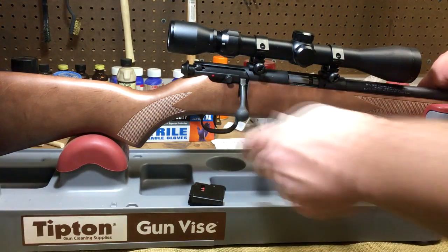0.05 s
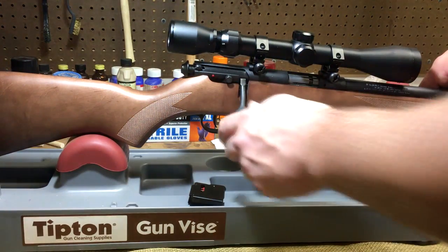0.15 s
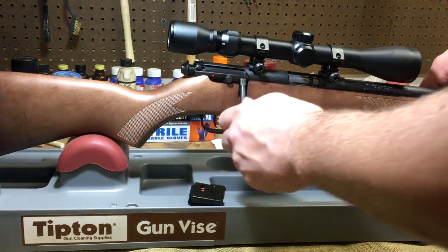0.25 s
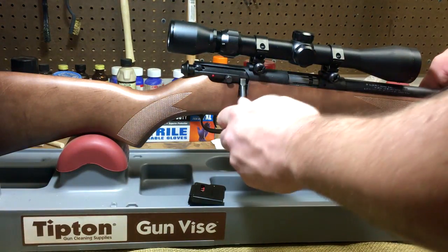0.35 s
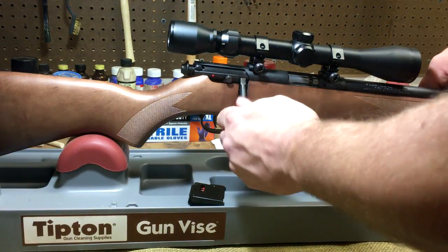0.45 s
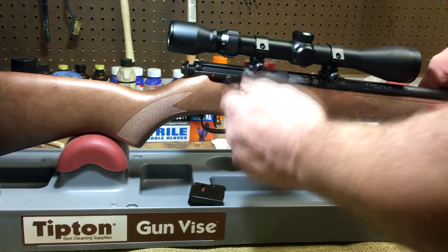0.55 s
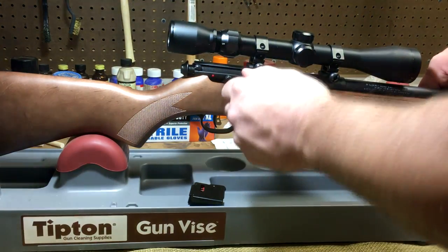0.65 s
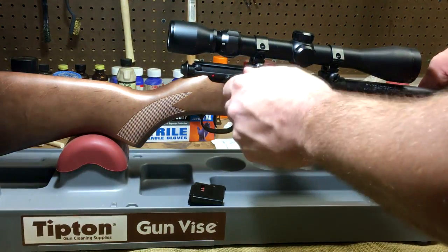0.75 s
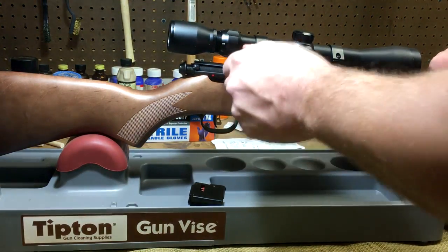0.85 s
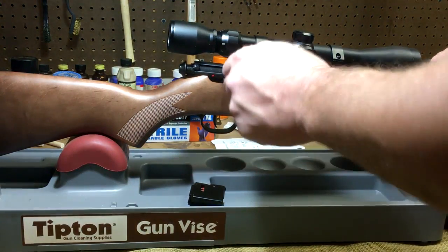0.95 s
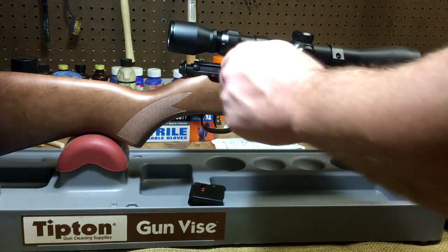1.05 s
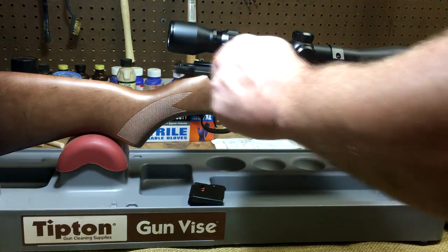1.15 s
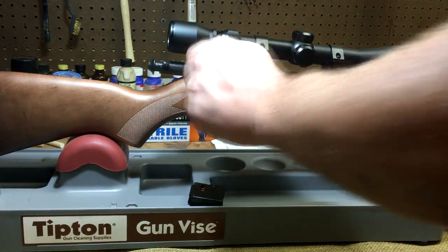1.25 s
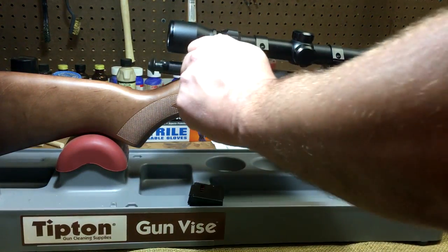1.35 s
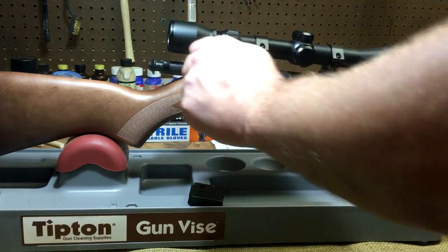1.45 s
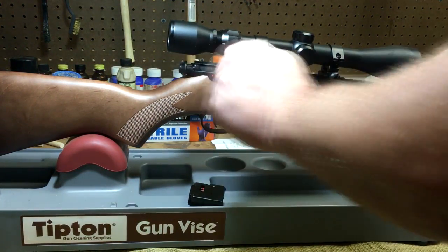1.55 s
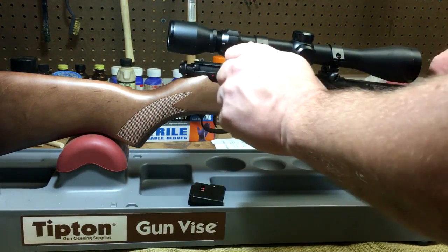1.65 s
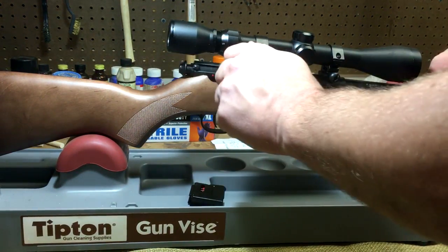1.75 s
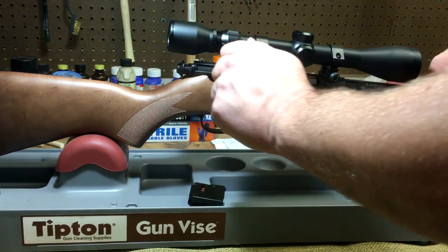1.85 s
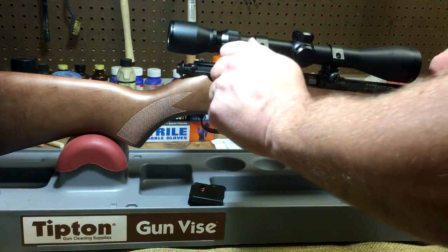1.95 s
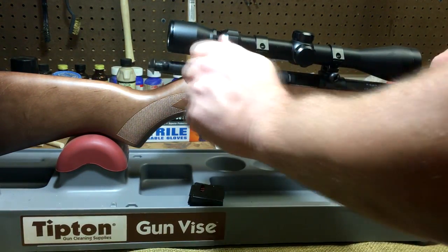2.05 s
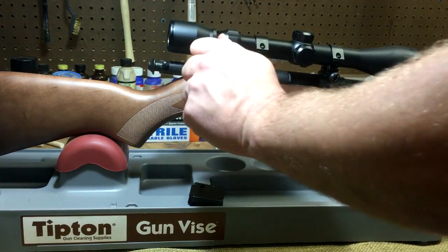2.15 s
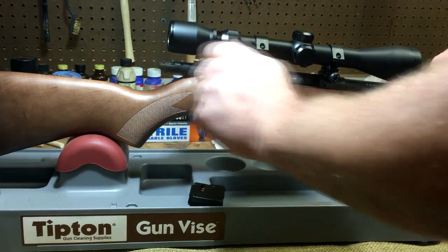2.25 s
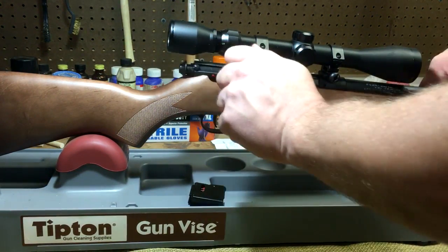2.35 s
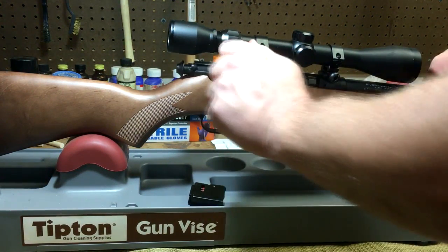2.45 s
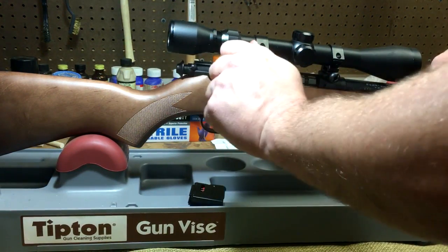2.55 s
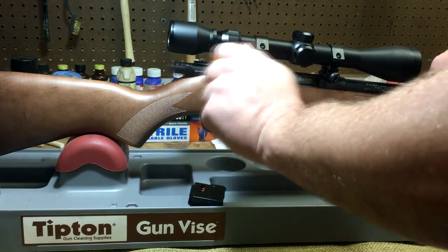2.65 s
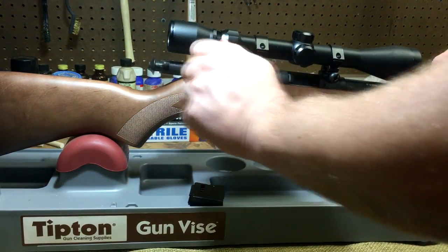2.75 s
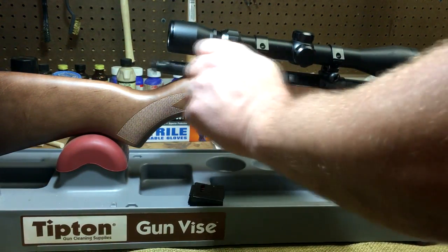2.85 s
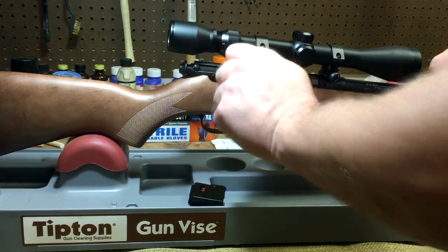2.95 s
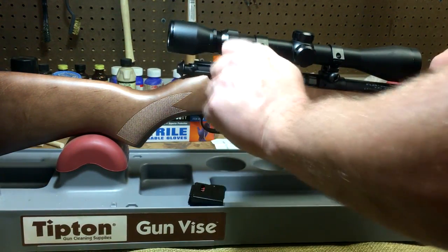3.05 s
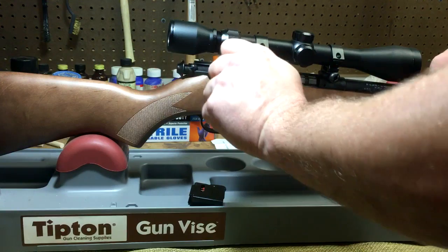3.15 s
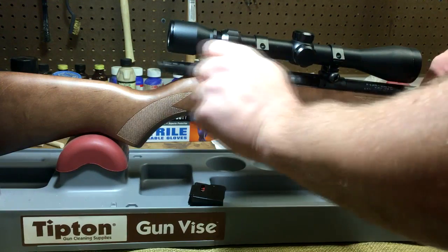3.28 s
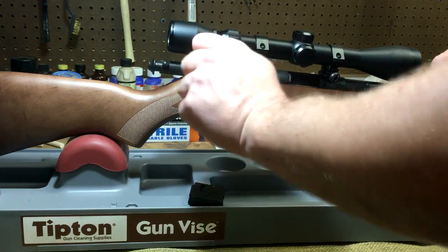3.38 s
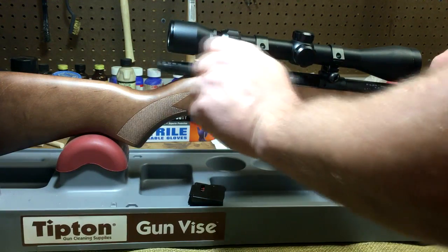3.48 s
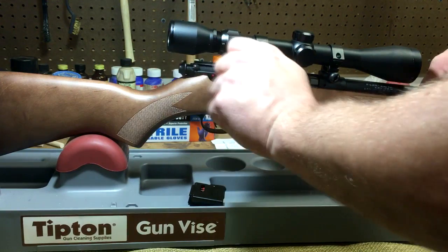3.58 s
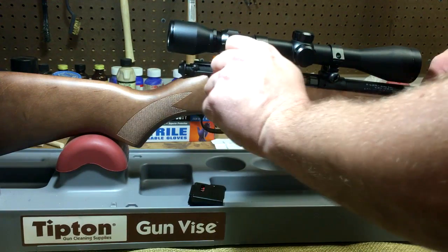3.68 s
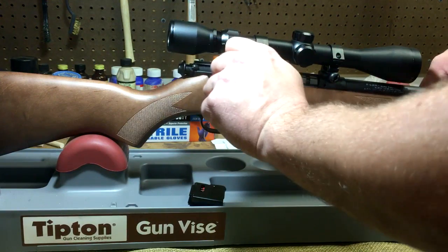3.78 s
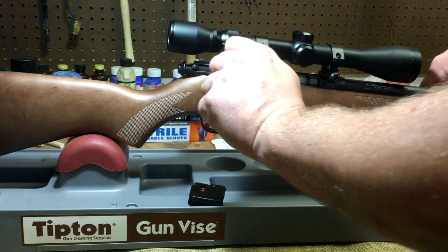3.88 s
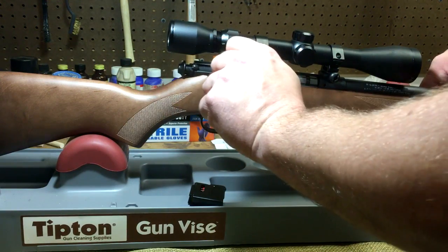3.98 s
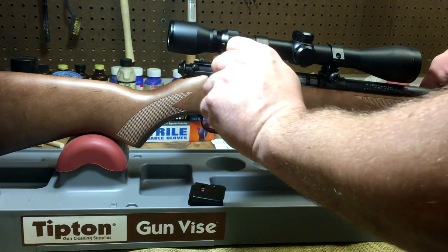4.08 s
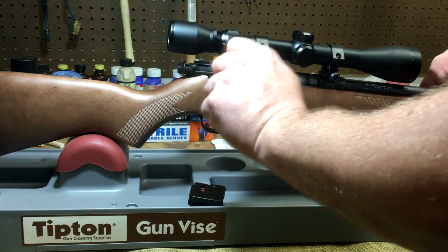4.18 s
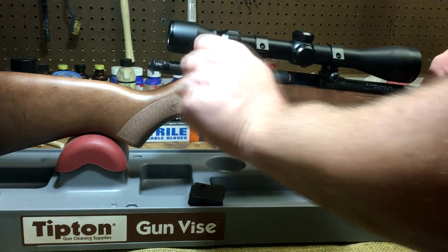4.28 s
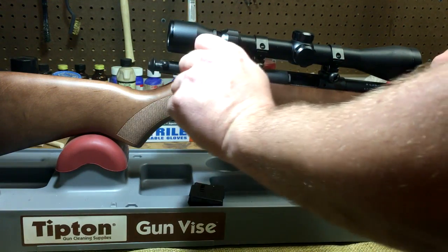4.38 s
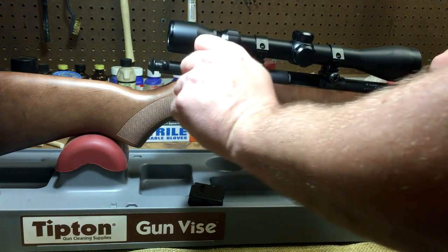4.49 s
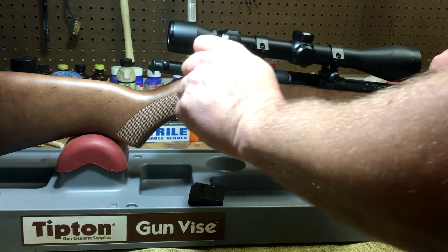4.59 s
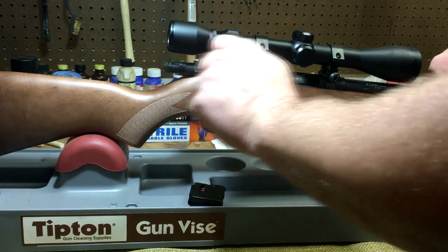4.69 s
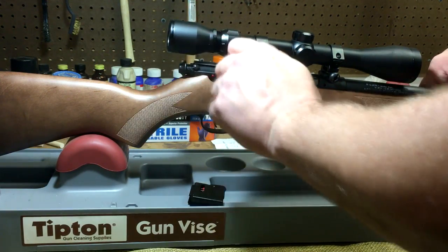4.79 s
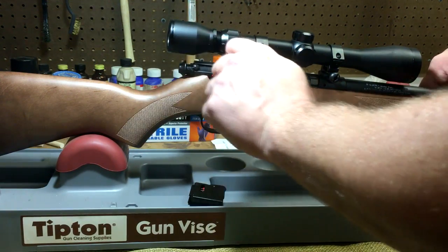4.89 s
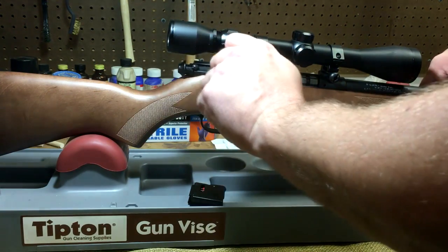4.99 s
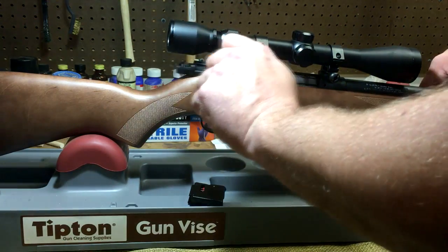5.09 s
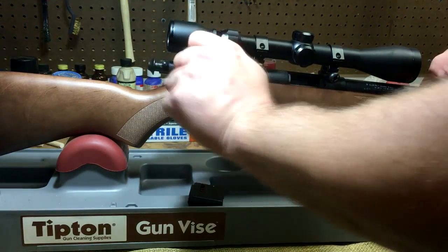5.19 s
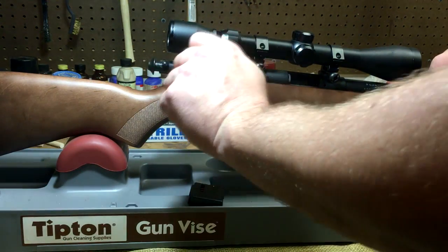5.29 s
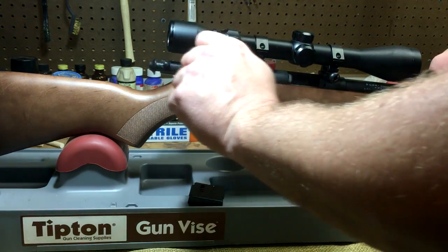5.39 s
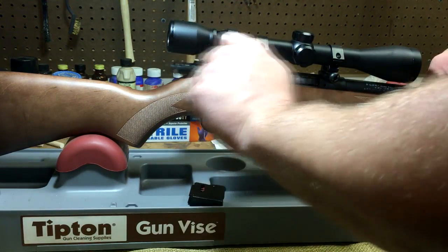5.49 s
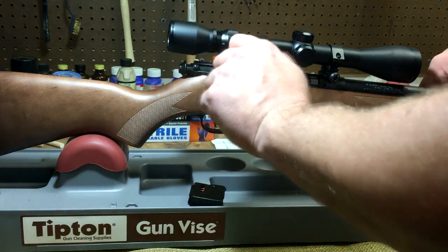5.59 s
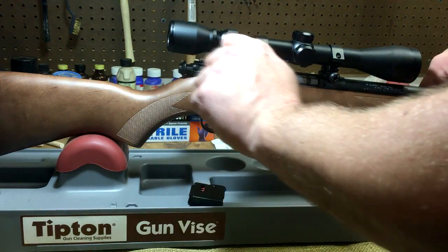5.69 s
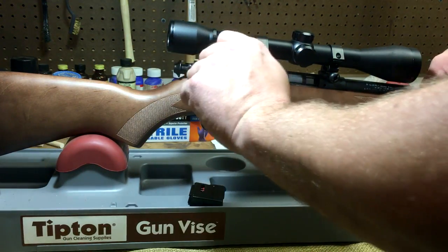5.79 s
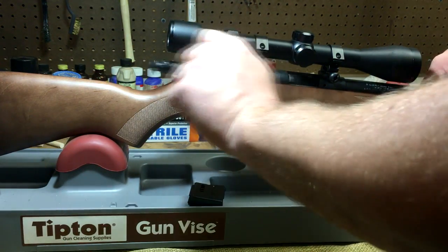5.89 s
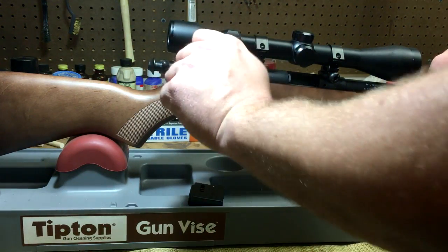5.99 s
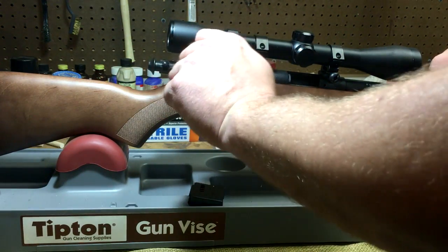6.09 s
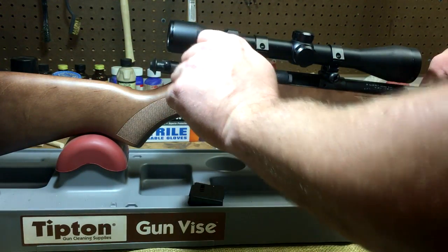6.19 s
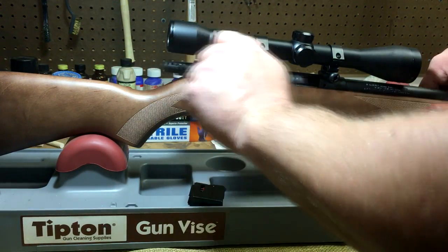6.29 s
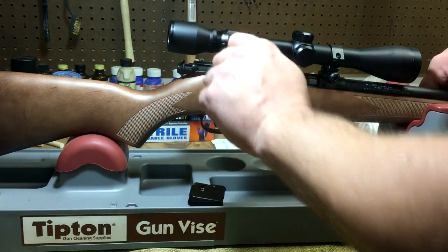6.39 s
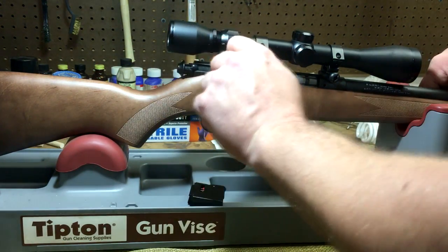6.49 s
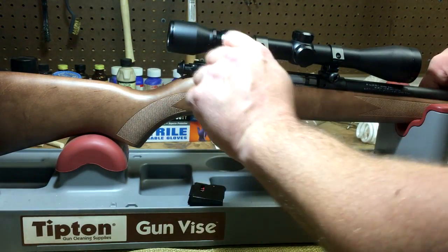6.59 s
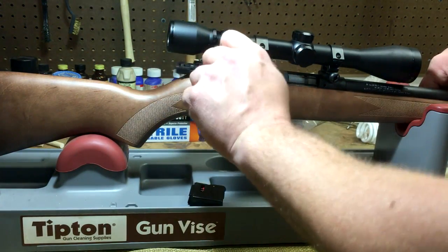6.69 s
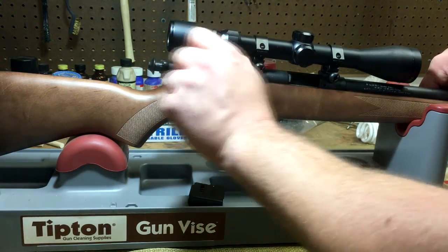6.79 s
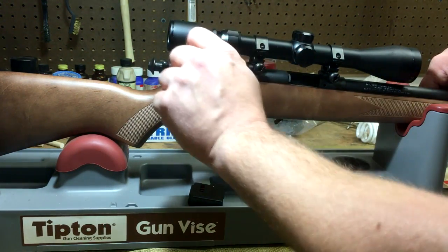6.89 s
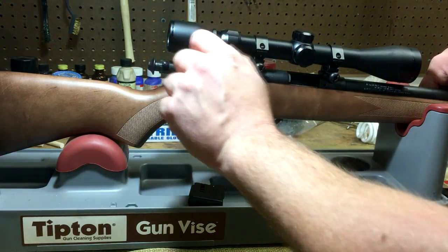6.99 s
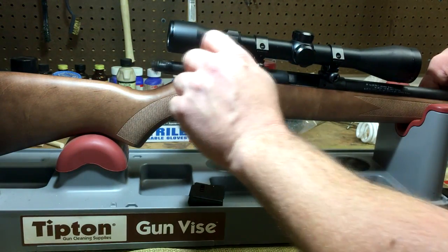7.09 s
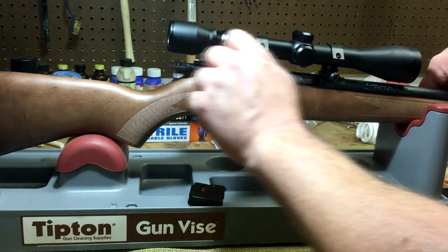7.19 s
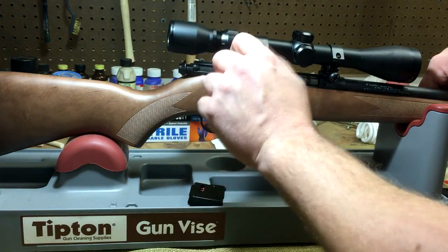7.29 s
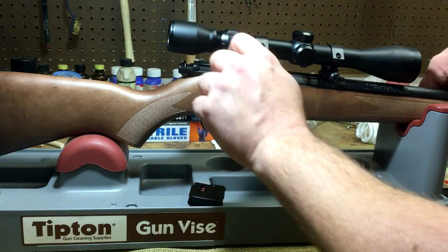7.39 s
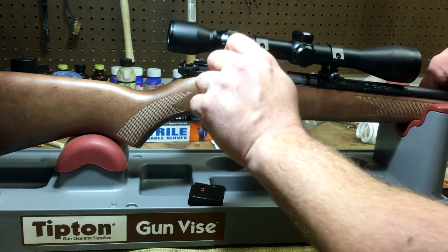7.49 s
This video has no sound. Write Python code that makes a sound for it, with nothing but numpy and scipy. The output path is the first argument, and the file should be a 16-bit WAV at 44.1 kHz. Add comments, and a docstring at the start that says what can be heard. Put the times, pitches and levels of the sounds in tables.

```python
"""A hand brushes along its rest, and the bolt handle of a rifle held in a plastic vise knocks as it is turned.
Then, eight times, the bolt jerks free, scrapes back (once with a faint high tick), clacks against its
rear stop and is pushed home. Each blow is a burst of noise bands plus ringing steel; low modes of stock
and vise thump a moment later. Wood creaks now and then, and a small, live workshop rings after every blow.
Faint noise of still air and a steady electric hum, made of sines, run throughout."""
import sys
import numpy as np
from scipy import signal
from scipy.fft import rfft, irfft
from scipy.io import wavfile

SR = 44100
rng = np.random.default_rng(int(sys.argv[2]) if len(sys.argv) > 2 else 0)


def output_pcm(signal):
    """Save a mono or channel-first signal as 16-bit PCM at the path in sys.argv[1].

    Samples are clipped to [-1, 1] before scaling.
    """
    pcm = np.clip(np.atleast_2d(signal).T, -1, 1) * 32767
    wavfile.write(sys.argv[1], SR, np.round(pcm).astype(np.int16))


N = 332514
TIME = np.arange(N) / SR
SHORT, LONG = TIME[:4096], TIME[:12288]  # time axes of single sounds [s]
BAND_HZ = 50 * 2 ** (np.arange(35) / 4)  # centres of the quarter-octave bands

# All levels of blows and scrapes are relative: rifle() sets their final loudness.
# knocks of the handle, and one faint high tick as the bolt slides back:
# (time [s], level [dB], favoured pitch [Hz], its boost [dB])
KNOCKS_AND_TICK = [(.566, -41, 2300, 1), (0.6345, -16, 588, 12), (0.8545, -19.5, 1300, 3),
                   (0.8739, 0, 2045, 9), (2.741, -34, 4115, 22)]
# the bolt jerks free, slides back and hits its rear stop:
# (jerk time [s], jerk level [dB], jerk pitch [Hz], scrape level [dB], stop time [s], stop level [dB],
#  hardness as treble tilt [dB per octave], stop pitch [Hz], its boost [dB])
PULLS = [(1.201, -27, 1320, -44, 1.3027, 1, .75, 1340, 2),
         (2.048, -26, 1700, -45, 2.1150, -1.5, -.5, 790, 5.5),
         (2.707, -33, 700, -50, 2.8108, -5, -1.5, 741, 24),
         (3.309, -35, 480, -45, 3.3834, -4.5, -1, 736, 21),
         (4.2653, -16, 1200, -49.5, 4.344, 0, -1, 562, 3),
         (5.157, -27.5, 740, -48.5, 5.2185, 1.2, 1, 3290, 2.5),
         (5.901, -27.5, 2300, -44.5, 5.9603, .5, 0, 1630, 4.5),
         (6.767, -24, 778, -49.5, 6.8451, -9, -.7, 3450, 11)]
# the bolt slides forward, touches the breech and then seats:
# (time of top speed [s], scrape level [dB], singing of the steel [dB], speed left on arrival [0-1],
#  touch time [s], touch level [dB], seating level [dB], seating pitch [Hz], its boost [dB])
PUSHES = [(1.585, -43.5, -8, .95, 1.6091, -4.5, 0, 1101, 4.5),
          (2.335, -42, -4.5, 1, 2.3454, -7.5, .5, 2177, -1),
          (2.955, -43.5, -2, .95, 2.9788, -10, -1.5, 3940, 4),
          (3.575, -43, -5.5, .95, 3.6128, -11, -17, 1900, 5),
          (4.715, -49, -7.5, 1, 4.8105, -16.5, -14.5, 500, 11.5),
          (5.525, -41, -1, .85, 5.5684, -14, -4.5, 4100, 9.5),
          (6.345, -41.5, -8.5, .2, 6.4170, -21, -30, 500, 10),
          (7.21, -50, -24, .65, 7.2766, -16, -14, 500, 13)]
# tone colour of knocks, tick and jerks: (frequency [Hz], relative level [dB])
KNOCK_COLOUR = [(150, -13), (350, 4), (700, -1.5), (1200, 1.5), (2300, 0), (3000, -9), (4200, -2),
                (6000, -18), (9000, -18), (13000, -21), (16000, -30.5)]
# tone colour of sliding: (frequency [Hz], relative level [dB])
SLIDE_COLOUR = [(150, -10), (300, 3), (480, 5.5), (650, 0), (1400, -5.5), (1900, -4), (2350, -3),
                (2850, -10), (4000, -5), (5000, -15.5), (7000, -13.5), (10000, -18.5), (16000, -29)]
THUMP_GROWTH = .62  # dB of thump for each dB of the blow


def undb(db):
    """Turn decibels into gain."""
    return 10 ** (np.asarray(db) / 20)


def unit(x):
    """Scale to an energy of one."""
    return x / np.sqrt(np.sum(x ** 2, axis=-1, keepdims=True) + 1e-18)


def read(table, hz, axis=1):
    """Read one column of a table between its rows, along log frequency."""
    table = np.array(table)
    return np.interp(np.log(np.maximum(hz, 1)), np.log(table[:, 0]), table[:, axis])


def add(out, s, x):
    """Mix x into out from time s."""
    i = int(s * SR)
    out[i:i + len(x)] += x[:N - i]


def fade(t, t60):
    """Die away exponentially, by 60 dB in t60 seconds."""
    return np.exp(-np.log(1000) * t / t60)


def tilt(hz, tilt_db, edge_hz=7000):
    """Lean the spectrum towards the treble for harder contacts, most of all above the edge."""
    octaves = np.log2(np.maximum(hz, 300) / 2000)
    octaves_past_edge = np.log2(np.maximum(hz / edge_hz, 1))
    return tilt_db * (octaves + 4 * octaves_past_edge)


def shade(x, colour, tilt_db=0):
    """Shape the spectrum of a signal and give it an rms of one."""
    hz = np.fft.rfftfreq(len(x), 1 / SR)
    gain = undb(read(colour, hz) + tilt(hz, tilt_db))
    return unit(irfft(rfft(x) * gain, len(x))) * np.sqrt(len(x))


def noise_bands(size):
    """Split noise into quarter-octave bands that overlap like triangles."""
    hz = np.fft.rfftfreq(size, 1 / SR) + 1
    octaves_away = np.abs(np.log2(hz) - np.log2(BAND_HZ[:, None]))
    share = np.maximum(1 - octaves_away * 4, 0)
    return irfft(rfft(rng.standard_normal(size)) * share, size)


def rifle():
    """What the rifle radiates in one direction: blows, scraping and creaks."""
    strokes = knocking() + pulling() + pushing()
    return undb(9.5) * strokes + undb(-1.5) * scraping() + creaks()


def knocking():
    """The handle knocks as it is turned; one faint high tick follows later, as the bolt slides back."""
    knocks = [(s, db, hardness(db), hz, boost_db) for s, db, hz, boost_db in KNOCKS_AND_TICK]
    steel = blows(knocks, KNOCK_COLOUR, press_s=.0015, ease_s=.0003, ring_db=-9, axis=2)
    return steel + thumps(knocks, level_db=-11.5)


def pulling():
    """The bolt jerks free and is thrown against its rear stop."""
    # tone colour of the rear stop: (frequency [Hz], relative level [dB])
    rear_colour = [(150, -15), (300, -6), (600, -2), (800, -8.5), (1200, 0), (2300, -0.5), (2800, -4.5),
                   (3600, 0.5), (5000, -6.5), (6500, -4.5), (8000, -12.5), (11000, -10.5), (13000, -18.5),
                   (16000, -29)]
    jerk_boost_db = 11  # lift of the favoured pitch
    jerks = [(s, db, hardness(db), hz, jerk_boost_db) for s, db, hz, *_ in PULLS]
    free = blows(jerks, KNOCK_COLOUR, press_s=.0015, ease_s=.0003, ring_db=-9, axis=2)
    free = free + thumps(jerks, level_db=-11)
    stop = blows(rear_stops(), rear_colour, press_s=.0013, ease_s=.00014, ring_db=-8.5, axis=1)
    return free + stop + thumps(rear_stops(), level_db=-9.7)


def pushing():
    """The bolt touches the breech, then seats with the weight of the hand behind it."""
    # tone colour of touch and seating: (frequency [Hz], relative level [dB])
    front_colour = [(150, -7.5), (300, -4.5), (480, 4), (620, 1.5), (1100, 3), (1550, 0), (2300, 3.5),
                    (2850, -10), (4100, 2), (5000, -11), (6300, -7.5), (7500, -16.5), (10000, -13),
                    (16000, -33.5)]
    touch_hz, touch_boost_db = 2150, 6  # region favoured by the touch
    touches = [(s, db, hardness(db), touch_hz, touch_boost_db) for _, _, _, _, s, db, *_ in PUSHES]
    steel = blows(touches + seatings(), front_colour, press_s=.0016, ease_s=.00006, ring_db=-7, axis=2)
    return steel + thumps(seatings(), level_db=-11)


def rear_stops():
    """The blow that ends each pull."""
    return [row[4:] for row in PULLS]


def seatings():
    """The blow that ends each push, a few milliseconds after the touch; a gentler push takes longer."""
    delay_s, delay_s_per_db = .0056, .00017  # delay at 0 dB, and how much each dB shortens it
    return [(s + delay_s - delay_s_per_db * db, db, hardness(db), hz, boost_db)
            for *_, s, _, db, hz, boost_db in PUSHES]


def hardness(db):
    """Treble tilt of a contact: the stronger the blow, the brighter."""
    soft_tilt_db, hard_tilt_db = -1.8, .8  # per octave, for the faintest contact and for a blow of 0 dB
    return soft_tilt_db + (hard_tilt_db - soft_tilt_db) * undb(db)


def contact(hz, tilt_db, focus_hz, focus_db, octaves=0.13):
    """Weight in dB of each frequency: hardness tilts it, the point of contact favours one region."""
    return tilt(hz, tilt_db) + focus_db * np.exp(-(np.log2(hz / focus_hz) / octaves) ** 2)


def blows(rows, colour, press_s, ease_s, ring_db, axis, softening=.3):
    """Steel hits steel: each row (s, dB, tilt, favoured Hz, boost) gives a clack and the ring of the action."""
    # ringing of the action: (frequency [Hz], relative level at the rear stop [dB],
    #  relative level at the front stop [dB], time to fade by 60 dB [s])
    steel_modes = [(692, -7, -11, 0.077), (813, 14, -25, 0.027), (1100.5, -25, 7, 0.075),
                   (1392, -2.5, -7, 0.024), (2240, -19.5, -8, .05), (2264, 3, 1, 0.14),
                   (2526, 5, 4.5, 0.027), (2910, -1.5, -7.5, 0.17), (3584, 3.5, -13, 0.12),
                   (4100, -15, -29, .05), (4210, 4.5, 0, 0.078), (4470, -6, -8.5, 0.11),
                   (5300, -5.5, -11.5, .04), (5832, -10, -2, 0.055), (6070, 0, -13.5, 0.086)]
    out = np.zeros(N)
    for s, db, tilt_db, focus_hz, focus_db in rows:
        touch = tilt_db, focus_hz, focus_db
        held_s = press_s * np.exp(-softening * tilt_db)  # a dull contact is a slow one
        attack_s = ease_s * min(undb(-db), 20)  # light touches ease into contact
        steel = unit(sum(undb(mode[axis] + contact(mode[0], *touch)) * ring(SHORT, mode[0], mode[3], attack_s)
                         for mode in steel_modes))
        band_db = read(colour, BAND_HZ) + contact(BAND_HZ, *touch)
        add(out, s, undb(db) * clack(band_db, attack_s, held_s))
        add(out, s, undb(db + ring_db) * steel)
    return out


def clack(band_db, attack_s, press_s, bend_cycles=1.5):
    """Dense short vibration: it holds while the parts press together, and low bending waves build up later."""
    # fading of the damped vibration of the whole rifle: (frequency [Hz], time to fade by 60 dB [s])
    clack_t60 = [(200, 0.099), (800, .055), (2000, .042), (5000, 0.02), (12000, 0.016)]
    t, hz = SHORT, BAND_HZ[:, None]
    rise_s = attack_s + bend_cycles / np.maximum(hz, 130)
    swell = 1 - np.exp(-(t / rise_s) ** 2)
    decay = fade(np.maximum(t - press_s - attack_s, 0), read(clack_t60, hz))
    bands = unit(noise_bands(size=len(t)) * swell * decay)
    # higher bands are wider, so they carry more energy
    return unit((undb(band_db) * np.sqrt(BAND_HZ)) @ bands)


def ring(t, hz, t60, lag=0., spread=.004):
    """One mode, swelling over its lag; the grip detunes it a little at each blow."""
    detuned_hz = hz * (1 + spread * rng.standard_normal())
    wave = np.sin(2 * np.pi * detuned_hz * t) * rng.choice([-1, 1])
    swell = 1 - np.exp(-(t / (lag + 1 / hz)) ** 2)
    return unit(wave * fade(t, t60) * swell)


def thumps(rows, level_db):
    """The stock answers each blow with a thump, which weakens less than the clack when the blow is light."""
    # modes of the wooden stock:
    # (frequency [Hz], relative level [dB], time to fade by 60 dB [s], lag [s])
    stock_modes = [(97, -7.5, .13, .012), (126.8, -6.5, 0.19, 0.01), (168, -11, .12, 0.0073),
                   (264.5, -6, 0.033, 0.0043), (290, -4, 0.13, .012), (326, 1, 0.09, 0.019),
                   (435.1, -3, 0.15, .004), (474.5, -4, .08, .003), (533, -10, 0.02, 0.0022)]
    out = np.zeros(N)
    for s, db, *_ in rows:
        add(out, s, undb(level_db + THUMP_GROWTH * db) * body(stock_modes))
    return out


def body(modes):
    """Low modes that take some milliseconds to swing up."""
    return unit(sum(undb(db) * ring(LONG, hz, t60, lag) for hz, db, t60, lag in modes))


def scraping():
    """The bolt slides once for each pull and each push."""
    take_up_s, breakaway_speed = .035, .68  # a pull takes up slack, breaks free at this share of top speed
    run_up_s, halt_s = .078, .015  # a push gathers speed slowly; a stop ends either stroke
    back = sum(slide([jerk - take_up_s, jerk, stop, stop + halt_s], [0, breakaway_speed, 1, 0],
                     db, singing_db=-10)
               for jerk, _, _, db, stop, *_ in PULLS)
    forward = sum(slide([fastest - run_up_s, fastest, touch, touch + halt_s], [0, 1, arrival, 0],
                        db, singing_db)
                  for fastest, db, singing_db, arrival, touch, *_ in PUSHES)
    return back + forward


def slide(times, speeds, db, singing_db):
    """The bolt scrapes along its raceway, its amplitude growing with the square of its speed."""
    # resonances of the bolt that rubbing sets singing:
    # (frequency [Hz], relative level [dB], time to fade by 60 dB [s])
    singing_modes = [(2310, 0, .009), (4150, -1, .011)]
    out = np.zeros(N)
    speed = np.interp(times[0] + LONG, times, speeds)
    grit = catches(grain_db=3.6, chatter_db=3.3, chatter_hz=110)
    bolt = sum(undb(mode_db) * ring(SHORT, hz, t60) for hz, mode_db, t60 in singing_modes)
    singing = unit(signal.fftconvolve(grit, bolt)[:len(LONG)]) * np.sqrt(len(LONG))
    scrape = shade(grit, SLIDE_COLOUR, tilt_db=.2) + undb(singing_db) * singing
    add(out, times[0], undb(db) * speed ** 2 * scrape)
    return out


def catches(grain_db=3.0, chatter_db=3.0, chatter_hz=110):
    """Tiny catches of one surface on another under an uneven pressure."""
    size = len(LONG)
    pressure = undb(chatter_db * np.interp(LONG * chatter_hz, np.arange(size), rng.standard_normal(size)))
    grains = undb(grain_db * np.minimum(rng.exponential(size=size), 5))
    return pressure * rng.standard_normal(size) * grains


def creaks(attack_s=.005, release_s=.015):
    """The stock shifts under the hand: wood slips on the pads of the vise in short, dull stutters."""
    # (time [s], length before the release [s], level [dB])
    slips = [(.96, .06, -45), (1.21, .03, -45), (1.92, .015, -52), (3.505, .06, -41), (4.275, .02, -38),
             (5.918, .03, -47), (6.617, .035, -56), (6.86, .03, -43), (7.012, .018, -43),
             (7.165, .08, -45.5), (7.37, .04, -52)]
    # tone colour of the wood: (frequency [Hz], relative level [dB])
    creak_colour = [(120, -18), (300, -4), (470, 2), (700, -9), (1300, -20), (2300, -25), (5000, -42),
                    (16000, -62)]
    out = np.zeros(N)
    for s, length_s, db in slips:
        envelope = np.interp(LONG, [0, attack_s, length_s, length_s + release_s], [0, 1, 1, 0])
        stutter = catches(grain_db=4.0, chatter_db=4.0, chatter_hz=130)
        add(out, s, undb(db) * envelope * shade(stutter, creak_colour))
    return out


def vise():
    """The vise rocks as the handle is levered, very faintly at the tick, and less when the bolt meets a stop."""
    # modes of the plastic vise:
    # (frequency [Hz], relative level [dB], time to fade by 60 dB [s], lag [s])
    vise_modes = [(48, -9.5, .15, .01), (64.4, 5.5, .3, 0.014), (82.5, -6.5, 0.23, .01)]
    knock_db, stop_db = -17.5, -30  # rocking, before scene() raises it
    drop_s, drop_db = .075, -8  # the rocked vise drops back onto the bench
    out = np.zeros(N)
    for s, db, *_ in KNOCKS_AND_TICK:
        add(out, s, undb(db + knock_db) * body(vise_modes))
        add(out, s + drop_s, undb(db + knock_db + drop_db) * body(vise_modes))
    for s, db, *_ in rear_stops() + seatings():
        add(out, s, undb(THUMP_GROWTH * db + stop_db) * body(vise_modes))
    return out


def brushing():
    """The hand brushes along the rest while reaching: each brush of skin swells and dies away."""
    # (time of the peak [s], half length [s], level [dB])
    brushes = [(.09, .15, -62), (.61, .06, -62)]
    envelope = sum(undb(db) * np.exp(-((TIME - s) / half_s) ** 2) for s, half_s, db in brushes)
    return envelope * shade(rng.standard_normal(N), SLIDE_COLOUR, tilt_db=.5)


def walls(x, build_s=0.0013, linger_t60=1.2):
    """A diffuse tail fades at its own pace in each band; a fainter one lingers in the far corners."""
    # the workshop: (frequency [Hz], time to fade by 60 dB [s],
    #  relative echo level [dB], relative lingering echo level [dB])
    room = [(80, 0.24, -4.5, -22), (198, 0.58, -2, -23), (405, 0.84, -5, -19.5), (870, 0.68, -6.5, -17.5),
            (1970, 0.66, -6.5, -17.5), (3940, 0.54, -11, -22), (6000, 0.42, -9, -21),
            (8700, 0.24, -10.5, -25), (15000, 0.11, -13, -26)]
    t, hz = TIME[:SR], BAND_HZ[:, None]
    bands = noise_bands(size=SR) * (1 - np.exp(-(t / build_s) ** 2))
    near = unit(bands * fade(t, read(room, hz))) * undb(read(room, hz, axis=2))
    far = unit(noise_bands(size=SR) * fade(t, linger_t60)) * undb(read(room, hz, axis=3))
    echo = unit(np.sqrt(BAND_HZ)) @ (near + far)
    return signal.fftconvolve(x, echo)[:N]


def background():
    """Still air as shaped noise, and the steady hum of an appliance as sines."""
    # tone colour of still air: (frequency [Hz], relative level [dB])
    air_colour = [(18, -49), (32, -23.5), (60, -16.5), (110, -23.5), (200, -23.5), (280, -30), (1250, -40),
                  (1600, -40.5), (2250, -36), (2700, -46), (11700, -53.5), (16000, -68.5)]
    # the hum: (frequency [Hz], rms level [dB])
    hum_tones = [(66.5, -74.5), (242.2, -65), (1443, -84), (2040, -82), (2283, -86)]
    air_db = -68.5  # rms
    hum = sum(undb(db) * np.sqrt(2) * np.sin(2 * np.pi * hz * TIME + rng.uniform(0, 2 * np.pi))
              for hz, db in hum_tones)
    return hum + undb(air_db) * shade(rng.standard_normal(N), air_colour)


def scene(bench_s=.0042, bench_db=-9, room_db=-8.5):
    """The direct sound, its bounce off the bench, and the room, which hears the rifle from several sides."""
    front = rifle() + undb(12) * vise() + brushing()
    above, behind = rifle(), rifle()
    echoes = walls(front) + walls(above) + walls(behind)
    out = front + undb(room_db) * echoes + background()
    add(out, bench_s, undb(bench_db) * front)
    return out[None]


def record(dry):
    """The microphone rounds the sharpest peaks and cuts the top."""
    ceiling, top_hz = 0.63, 16000
    rounded = ceiling * np.tanh(dry / ceiling)
    return signal.sosfilt(signal.ellip(8, .2, 70, top_hz, fs=SR, output="sos"), rounded)


dry = scene()
out = record(dry)
output_pcm(out)
```